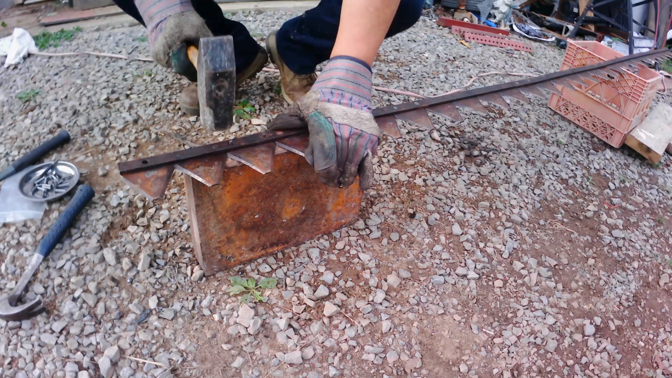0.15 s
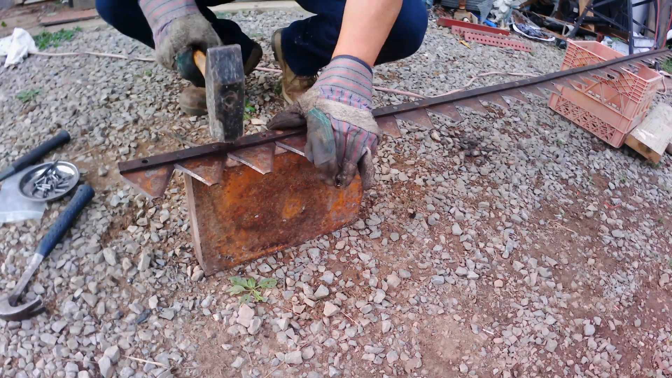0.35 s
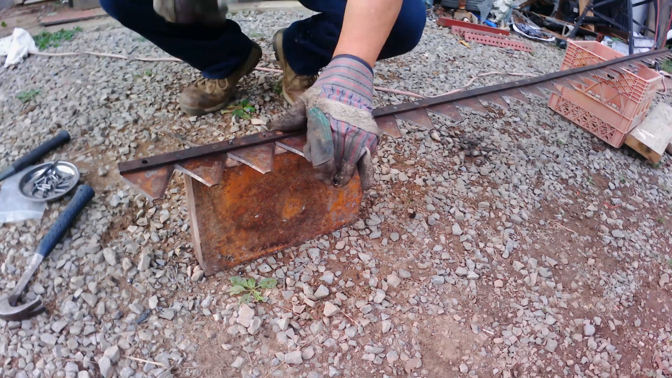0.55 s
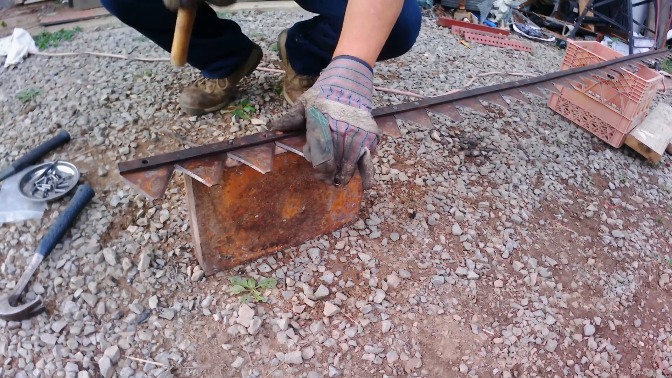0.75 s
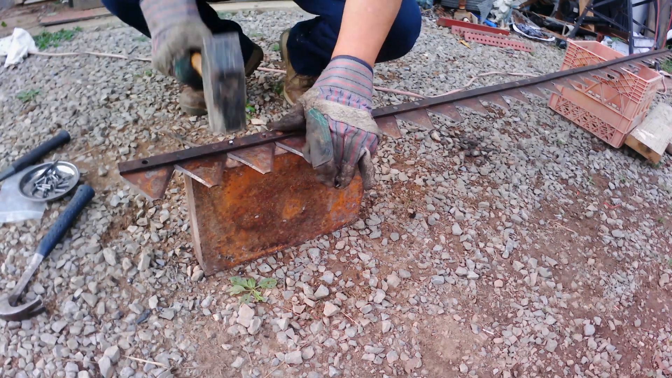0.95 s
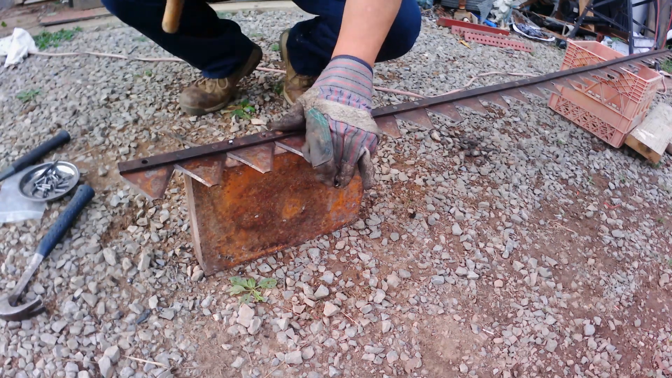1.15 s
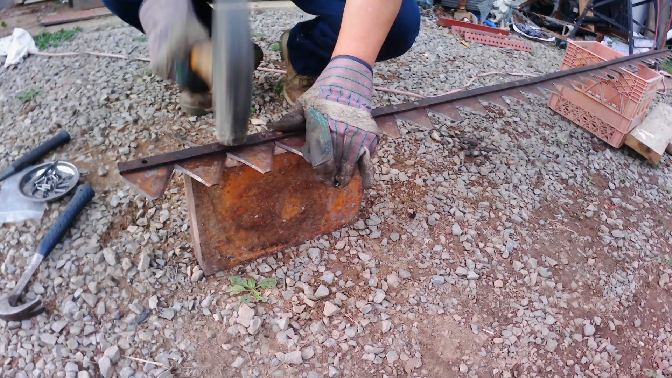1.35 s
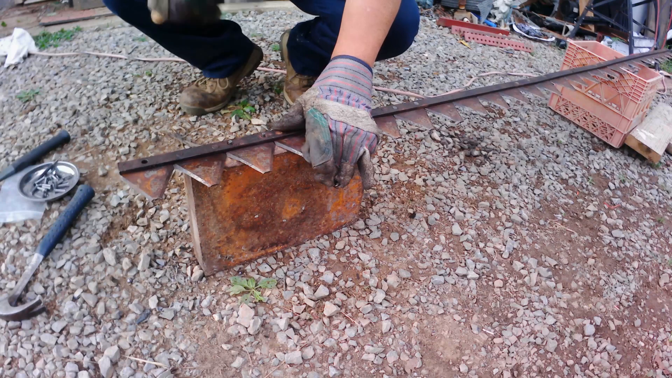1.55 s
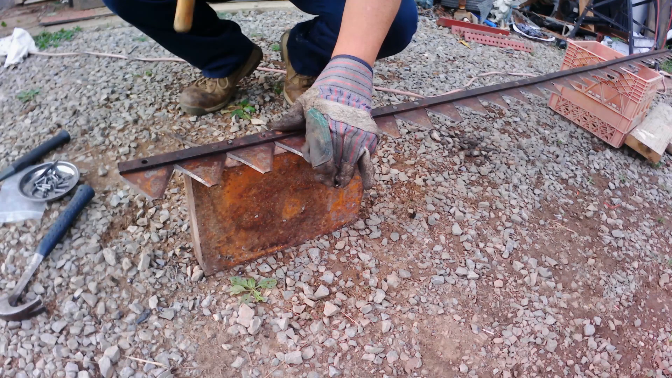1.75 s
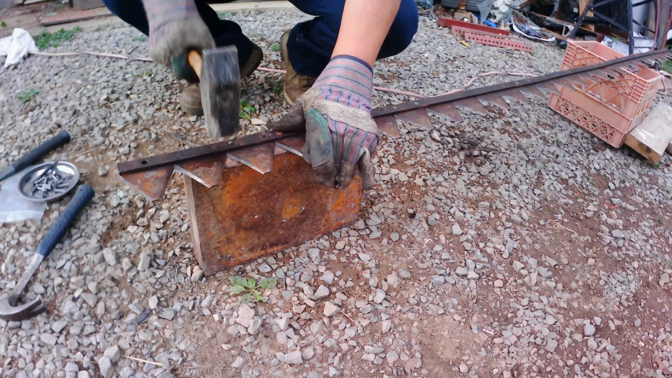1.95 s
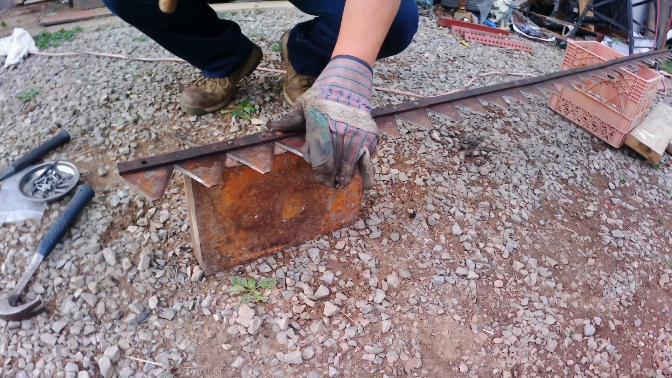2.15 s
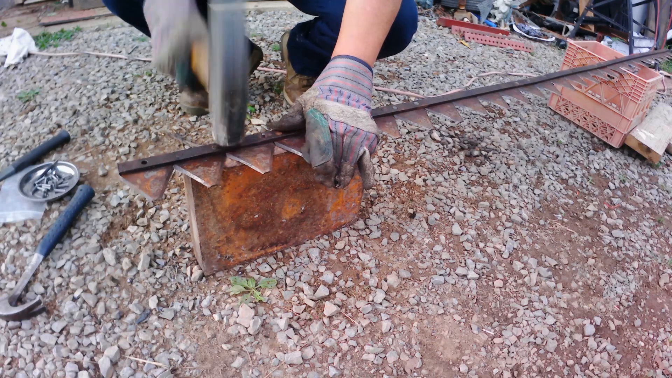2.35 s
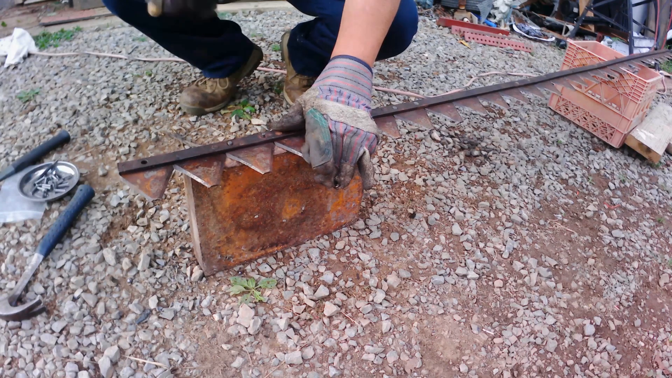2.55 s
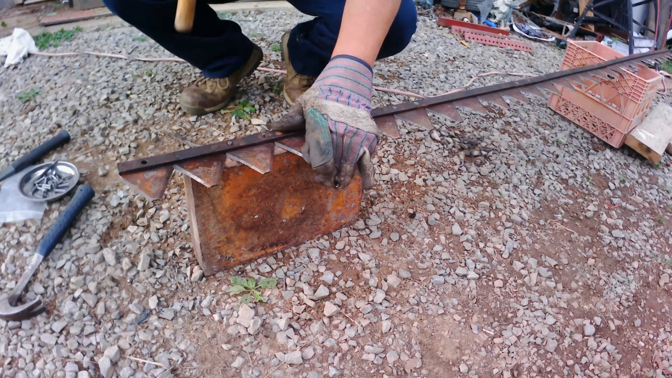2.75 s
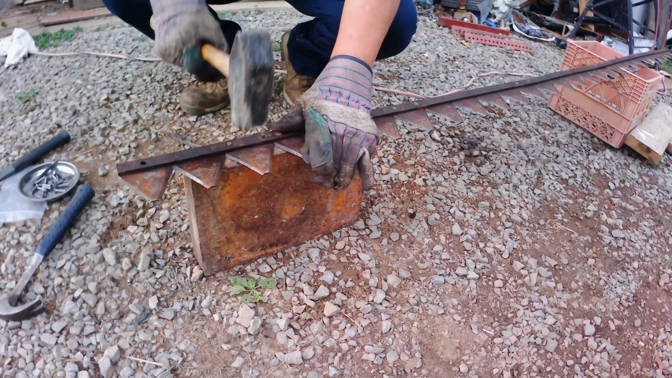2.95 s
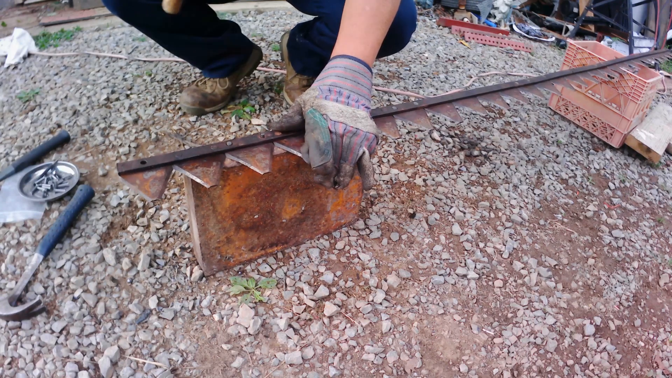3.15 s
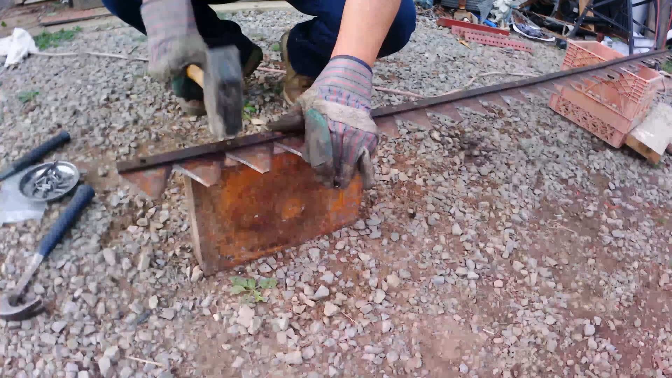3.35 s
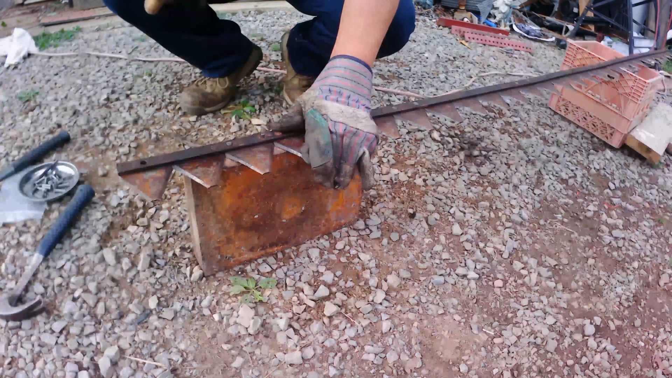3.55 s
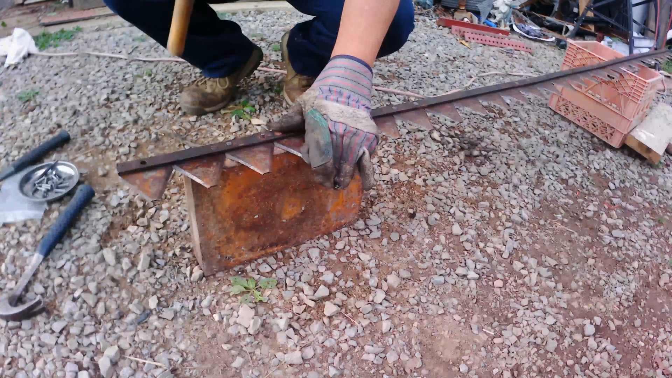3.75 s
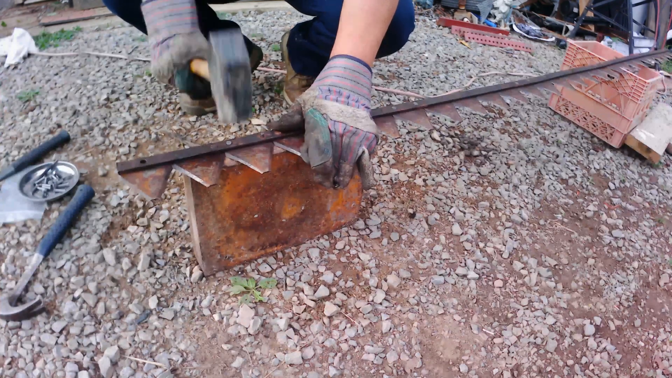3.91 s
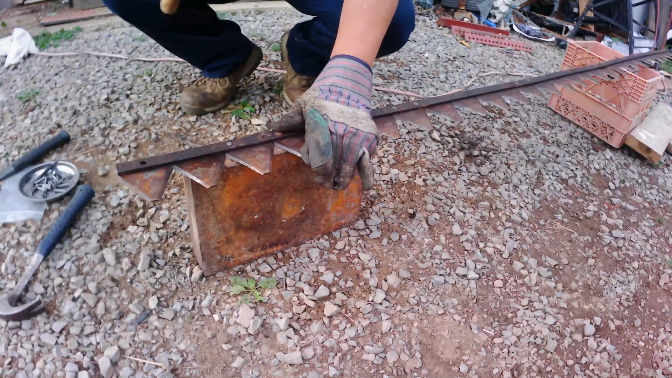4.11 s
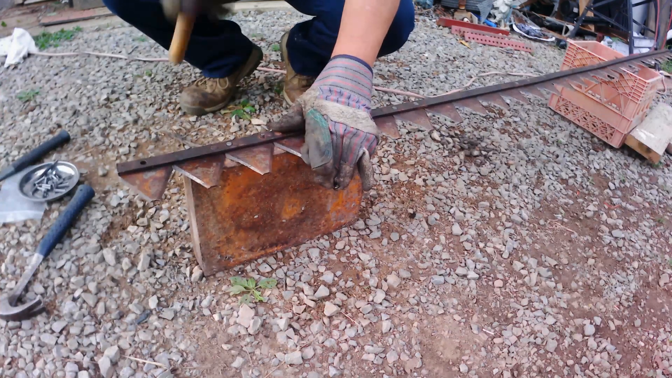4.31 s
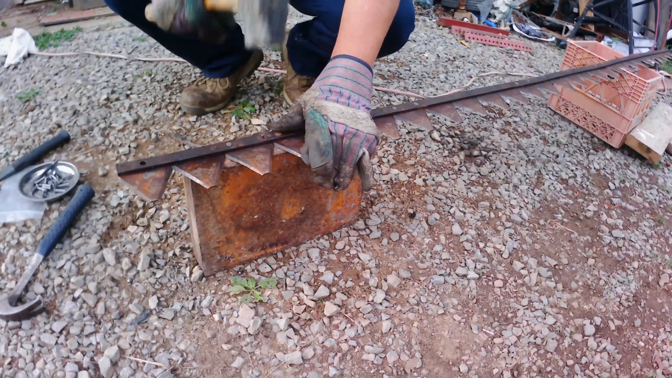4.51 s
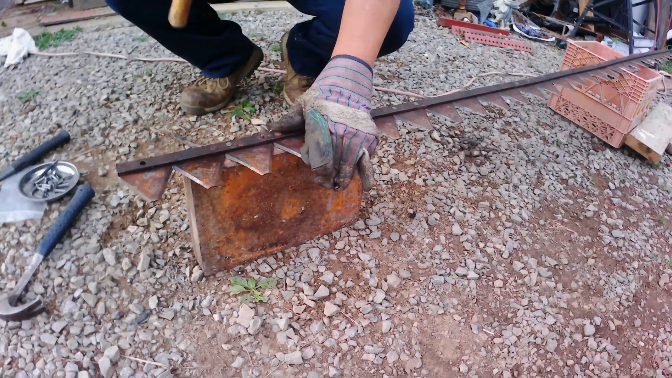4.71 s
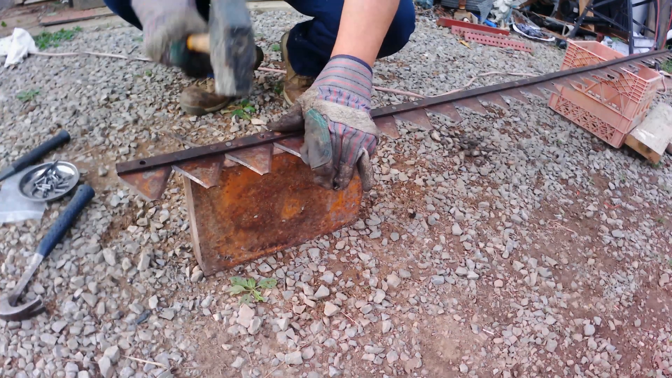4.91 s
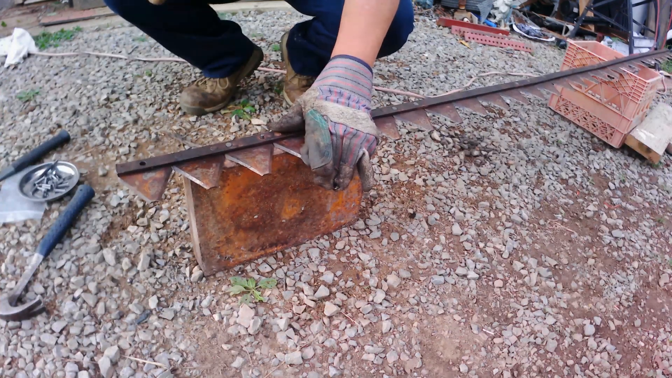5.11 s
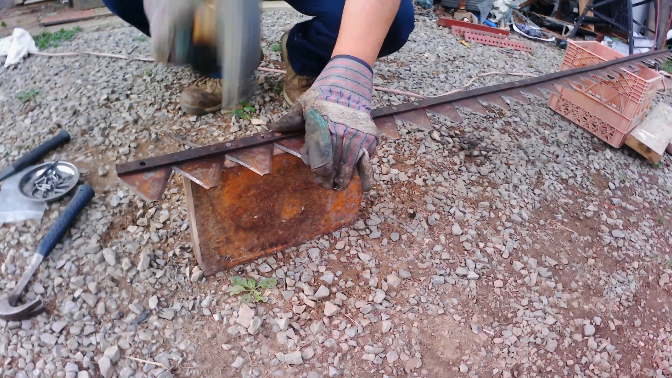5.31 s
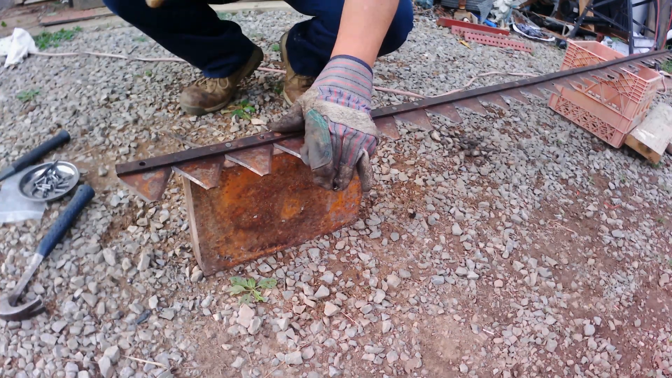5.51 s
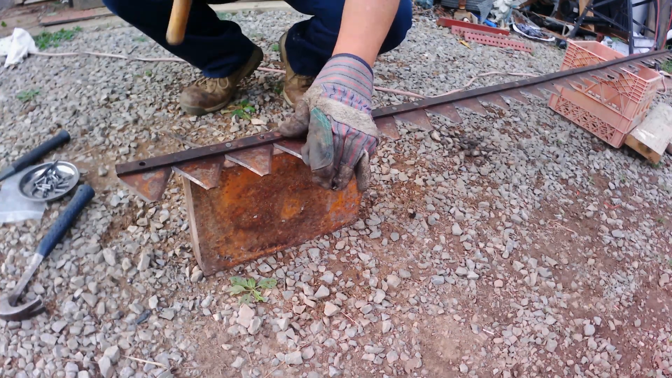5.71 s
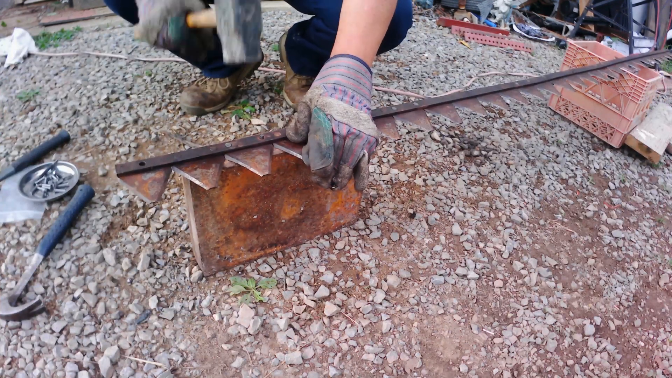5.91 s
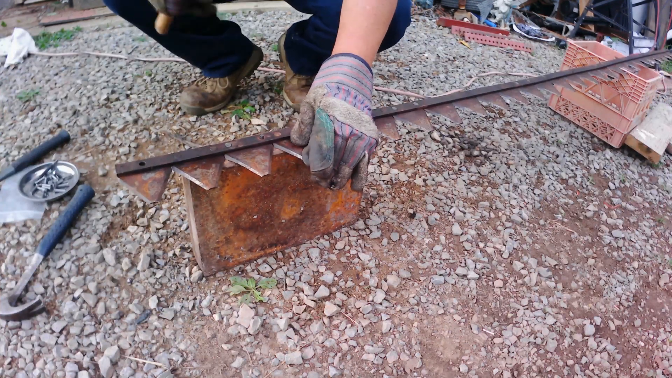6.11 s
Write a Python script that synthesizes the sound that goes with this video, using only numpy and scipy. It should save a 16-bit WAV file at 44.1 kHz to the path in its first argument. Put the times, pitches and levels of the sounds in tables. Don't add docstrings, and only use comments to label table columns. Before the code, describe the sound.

A gravel yard with quiet, steady hum and a faint, slightly wavering mid-pitched whine from a distant fan. In the first 0.15 seconds there are small dull ticks and scuffs of a tool and boots; another quick cluster of light metal taps comes at about 0.7. At 0.9 the first heavy hammer blow lands on a steel bar over a block, followed by blows about every half second: 1.4, 1.9, 2.4, 2.9, 3.4, 3.9, 4.3, 4.8, 5.3 and 5.8. The early ones are more restrained; from about 3 seconds they become harder, brighter and longer, strongest near the end. Each is an abrupt, clipped metallic crack with a knocking rivet, rattling loose blades, a quick bounce, a low thud into gravel, high ringing from the hammer head and a short wash from sheds. The last ring fades into hum and whine until 6.3.

```python
import sys
import numpy as np
from scipy import signal
from scipy.io import wavfile
from scipy.ndimage import uniform_filter1d

SR = 44100
rng = np.random.default_rng(int(sys.argv[2]) if len(sys.argv) > 2 else 0)


def put_to_file(sound):
    columns = np.atleast_2d(sound).T
    safe = np.clip(columns, -1, 1)
    whole_steps = np.round(safe * 32767)
    wavfile.write(sys.argv[1], SR, whole_steps.astype(np.int16))


def volts_from_decibels(level):
    exponent = np.asarray(level, float) / 20
    return 10 ** exponent


N = 276507

# (frequency [Hz], density [dB per Hz])
HUM_SPECTRUM = [(15, -70.5), (25, -40), (102, -6.5), (363, -12.5), (545, -15.5), (624, -4.5), (695, -17.5),
                (1130, -11.5), (3340, -32), (11300, -36.5), (12500, -40.5), (13600, -79), (16000, -83)]
# (time [s], frequency [Hz], level [dB])
FAN_TONE = [(0, 627, -48.5), (.3, 628.6, -40), (.65, 631.2, -44), (.7, 631.8, -56), (.77, 630.9, -40.5),
            (2.2, 636.6, -36), (2.62, 632.6, -40), (3.0, 641, -39.5), (3.4, 634, -38.5), (3.6, 633, -37),
            (4.3, 637.5, -39), (4.45, 646, -47), (4.56, 637.5, -40), (5.15, 640, -39), (5.451, 636.4, -40),
            (5.65, 638.2, -38.5), (6.0, 635.8, -37.5), (6.27, 635.5, -38)]
# (frequency [Hz], width [Hz], level [dB])
FAN_HISS = [(4237, 60, -78), (7150, 200, -70), (10815, 80, -71)]
# (time [s], peak level [dB], pitch [Hz], t60 [s])
TOUCHES = [(0.012, -26.5, 1050, 0.017), (.021, -42, 500, .02), (.039, -31, 560, .02),
           (.064, -29, 720, 0.013), (.083, -29, 1150, 0.012), (.119, -30, 487, 0.02),
           (0.664, -34, 890, 0.021), (0.686, -29, 1120, 0.017), (0.696, -24, 1050, 0.015),
           (0.7099, -20.5, 1160, 0.013), (.721, -36, 920, 0.012), (0.7316, -23, 1100, 0.016),
           (0.739, -35, 1200, .015), (.75, -34, 704, 0.032)]
# (frequency [Hz], t60 [s])
SHED_SPECTRUM = [(100, -15), (500, 10.5), (1500, 5), (2200, 7), (2900, 6.5), (3300, -2.5), (4200, 4),
                 (6000, -7), (8000, 1), (15000, 0)]
SHED_T60 = [(200, 0.35), (2000, 1.99), (5000, 1.61), (10000, 0.22)]
# (frequency [Hz], level [dB], t60 [s])
FREE_END_MODES = [(112.6, -30, 1.25), (205.5, -37.5, 1.4)]
# (frequency [Hz], level [dB], t60 [s])
THUD_MODES = [(71, -45, 0.033), (157.6, -4.5, 0.043), (160.3, -13, 0.059), (239.8, -17, 0.069),
              (390.4, -20.5, 0.08)]
# (frequency [Hz], width [Hz], level [dB], t60 [s])
BLOCK_RINGS = [(1051, 25, -32, 0.44), (2020, 25, -74, 0.37), (2264, 7.4, -47, 1.64), (2664, 38, -56, 2.2),
               (2836, 34, -50, 1.25), (3900, 90, -54, 1.3), (5680, 100, -53.5, 1.14)]
# (level [dB], t60 [s])
HEAD_HZ = [5590, 5950, 7550, 7854, 11700, 12000]
HEAD_DECAYS = [(-24, 0.17), (-41, 0.075), (-14, 0.2), (-16.5, 0.28), (-53, 0.095), (-42, 0.15)]
# (frequency [Hz], level [dB], t60 [s])
RIVET_MODES = [(1050, 8, 0.027), (1242, 2, 0.018)]
# (frequency [Hz], t60 [s])
CRACK_SPECTRUM = [(100, -39), (400, -8), (1000, -14), (2500, -8), (6000, -5), (15000, -31)]
CRACK_T60 = [(500, 0.099), (3000, 0.028), (10000, 0.017)]
# (frequency [Hz], t60 [s])
CLATTER_SPECTRUM = [(60, -19), (110, -1.5), (500, -3), (800, 0), (1050, -0.5), (1600, -1), (2200, -3.5),
                    (2800, -3), (3100, -13), (3900, -4), (4500, -9.5), (6000, -19.5), (8000, -17),
                    (16000, -49)]
CLATTER_T60 = [(100, 0.21), (600, 0.073), (1500, 0.11), (3000, 0.087), (6000, 0.086), (14000, 0.017)]
# (frequency [Hz], level [dB], t60 [s])
BAR_MODES = [(223, -10, 0.093), (486, -27, 0.37), (1048, 3, 0.08), (1200, -3, 0.075), (1490, 11, 0.029),
             (1640, -4.5, 0.1), (1806, 3, 0.1), (2235, -1.5, 0.15), (2494, -3, 0.12), (2645, -0.5, 0.086),
             (2712, 5, 0.095), (3800, -20, 0.033), (3773, -3, 0.11), (4750, -20.5, 0.14), (6030, -15, 0.13),
             (7000, -20, 0.039), (7600, -16.5, 0.16), (7550, -44.5, 0.26)]
# (time [s], strength [dB], rebound [dB], hammer side ring [dB], hammer face ring [dB])
BLOWS = [(0.8929, -14.5, -3, 3, -24), (1.3941, -10.5, -7, 7, -17), (1.8994, -12, -2.5, -3, -9.5),
         (2.3924, -8.5, -2.5, 10, -8.5), (2.888, -5, -8.5, 2, -9), (3.3776, -4, -6, -12, -7),
         (3.8646, -0.5, -11, -3, 4.5), (4.3446, -1.5, -12.5, -11, -0.5), (4.8229, 0, -14, 4, -2),
         (5.3079, 0.5, -8.5, -5, 4), (5.7875, -1, -12.5, 11, -2)]
# (frequency [Hz], level [dB])
MICROPHONE = [(20, -22), (52, -0.5), (85, 1.1), (9000, -5.45), (12200, -3), (12900, -7.5), (15600, -15.5),
              (16300, -40)]

BRIGHTNESS = 1.98, 0.31
RING_LENGTH = 0.97, 0.012
THUD_DB, SWAY_DB, BLOCK_DB = (11, 0.35), (1, 0.18), (4, 1.2)
TOP_RING_DB, ECHO_DB = (6.5, 1.4), (17, 1.33)


def evened(x):
    return x / np.sqrt(np.mean(x ** 2) + 1e-20)


def read(points, hz):
    f, value = np.transpose(points)
    return np.interp(np.log(hz + 1), np.log(f + 1), value)


def add(mix, s, sound):
    part = mix[round(s * SR):][:len(sound)]
    part += sound[:len(part)]


def follow(rule, strength_db):
    return rule[0] + rule[1] * strength_db


def resonate(x, hz, width):
    turn = np.exp(2j * np.pi * np.cumsum(hz * np.ones(len(x))) / SR)
    r = np.exp(-np.pi * width / SR)
    return 2 * (turn * signal.lfilter([1 - r], [1, -r], x / turn)).real


def ring(modes, t, tilt_db, length, scatter_db, split, turns):
    hz, db, t60 = np.repeat(np.transpose(modes), 3, axis=1)[:, :, None]
    a, b, c = rng.standard_normal((len(hz), 1, 3)).transpose(2, 0, 1)
    level_db = db - 7.5 + tilt_db * np.log2(hz / 1000) + scatter_db * a
    start = volts_from_decibels(level_db) * np.exp(2j * np.pi * turns * c)
    pole = 2j * np.pi * hz * (1 + split * b) - np.log(1000) / (t60 * length)
    return ((start * np.exp(pole * t[::180])).T @ np.exp(pole * t[:180])).imag.ravel()


def wash(colour, t60s, count, tilt_db, length, size):
    hz = np.fft.rfftfreq(size, 1 / SR)[:, None]
    t = np.arange(count * 4 // size + 5) * (size // 4) / SR
    a, b = rng.standard_normal((len(t), len(hz), 2)).T
    start = volts_from_decibels(read(colour, hz) + tilt_db * np.log2(hz / 1000 + 0.054))
    decay = volts_from_decibels(-60 * t / (length * read(t60s, hz)))
    z = (a + 1j * b) * start / np.linalg.norm(start) * decay
    return signal.istft(z, nperseg=size, noverlap=size * 3 // 4)[1][:count]


def hum():
    hz = np.fft.rfftfreq(1024, 1 / SR)
    a, b, patches = rng.standard_normal((N // 256 + 5, 513, 3)).T
    patches = evened(uniform_filter1d(uniform_filter1d(patches, 10, 0), 12, 1))
    z = (a + 1j * b) * volts_from_decibels(read(HUM_SPECTRUM, hz)[:, None] + 0.46 * patches)
    level_db = -42.5 + 1.5 * np.exp(-np.arange(N) / SR / 0.091)
    return volts_from_decibels(level_db) * evened(signal.istft(z, nperseg=1024, noverlap=768)[1][:N])


def whine():
    t = np.arange(N) / SR
    s, hz, db = np.transpose(FAN_TONE)
    waver = evened(uniform_filter1d(uniform_filter1d(rng.standard_normal((2, N)), 900), 900))
    turns = np.cumsum(np.interp(t, s, hz) + 1.7 * waver[0]) / SR
    swell_db = 0.55 * evened(uniform_filter1d(waver[1], size=4000))
    tone_db = np.interp(t, s, db) + 0.34 * waver[1] + swell_db
    tone = volts_from_decibels(tone_db) * np.sin(2 * np.pi * turns)
    near_db, far_db, fades_s = -50.5, -60.5, 0.58
    octave_db = far_db + (near_db - far_db) * np.clip((fades_s - t) / 0.12, 0, 1)
    octave_db += 3.7 * evened(uniform_filter1d(waver[0], size=9000))
    tone += volts_from_decibels(octave_db) * np.sin(4 * np.pi * turns)
    air = rng.standard_normal(N)
    hiss = sum(volts_from_decibels(d) * evened(resonate(air, f, w)) for f, w, d in FAN_HISS)
    return np.sqrt(2) * tone + hiss


def touch(peak_db, hz, t60):
    t = np.arange(3000) / SR
    knock = np.sin(2 * np.pi * hz * t)
    knock += 0.4 * np.sin(2 * np.pi * 420 * t) + 0.08 * np.sin(2 * np.pi * 2300 * t)
    grit = rng.standard_normal(len(t))
    scuff = evened(resonate(resonate(grit, 390, 350), 390, 350))
    scuff += 0.49 * evened(resonate(resonate(grit, 1340, 700), 1340, 700))
    tick = knock * volts_from_decibels(-60 * t / t60) + 0.19 * scuff * volts_from_decibels(-60 * t / 0.079)
    tick *= np.sin(np.pi / 2 * np.clip(t / 0.0013, 0, 1)) ** 2
    return volts_from_decibels(peak_db) * tick / abs(tick).max()


def shed_echoes(t, strength_db):
    echoes = 0.73 * np.clip((t - 0.03) / 0.026, 0, 1)
    echoes += 0.43 * np.clip((t - 0.11) / 0.02, 0, 1)
    echoes += 0.48 * np.exp(-((t - 0.25) / 0.089) ** 2)
    level = volts_from_decibels(follow(ECHO_DB, strength_db) - 49.5)
    return level * wash(SHED_SPECTRUM, SHED_T60, len(t), 0, 0.98, size=256) * echoes


def free_end(t, strength_db):
    db = follow(SWAY_DB, strength_db)
    late = np.clip((t - 0.045) / 0.06, 0, 1) * np.clip((0.31 - t) / 0.08, 0.2, 1)
    beat = 1 + 0.3 * np.cos(2 * np.pi * 10.5 * (t - 0.11))
    low = ring(FREE_END_MODES[:1], t, 0, 0.54, scatter_db=0.6, split=0.022, turns=0.03)
    high = ring(FREE_END_MODES[1:], t, 0, 0.72, scatter_db=1.7, split=0.012, turns=0.023)
    return volts_from_decibels(db + 7) * low * late * beat + volts_from_decibels(db + 3) * high * np.clip(t / 0.087, 0, 1)


def ground_thud(t, strength_db):
    ground = ring(THUD_MODES, t, 0, 1, scatter_db=0.4, split=0.004, turns=0.01)
    return volts_from_decibels(follow(THUD_DB, strength_db) + 3.5) * ground * (1 - np.exp(-t / 0.0066))


def block_rings(t, strength_db):
    grit = rng.standard_normal(len(t))
    whistles = sum(volts_from_decibels(db + 2.8 * chance - 60 * t / t60) * evened(resonate(grit, hz, width))
                   for (hz, width, db, t60), chance in zip(BLOCK_RINGS, grit))
    return volts_from_decibels(follow(BLOCK_DB, strength_db)) * whistles


def hammer_head(t, side_db, face_db, top_db):
    head = np.column_stack([HEAD_HZ, HEAD_DECAYS])
    head[:, 1] += np.repeat([side_db, face_db, top_db], 2)
    return ring(head, t, 0, 0.75, scatter_db=3.0, split=0.004, turns=0.36)


def blade_shimmer(t, top_db):
    low_hz, high_hz, db, t60 = 8237, 12409, -31.5, 0.2049
    blades = [(hz, db + top_db, t60) for hz in low_hz + (high_hz - low_hz) * rng.random(10)]
    return ring(blades, t, 0, 0.65, scatter_db=5.5, split=0.018, turns=0.26)


def squeezed_rivet(t, strength_db):
    knock = ring(RIVET_MODES, t, 0, 0.64, scatter_db=1.1, split=0.018, turns=0)
    return volts_from_decibels(0.5 * strength_db + 13.5) * knock


def clatter(t, rebound_db, tilt_db, length):
    def burst(tilt, stretch):
        return wash(CLATTER_SPECTRUM, CLATTER_T60, len(t), tilt, stretch, size=128)

    chatter_db = 2.03 * evened(uniform_filter1d(rng.standard_normal(len(t)), 250))
    sound = volts_from_decibels(5.0 + chatter_db) * burst(tilt_db, length)
    landing = burst(tilt_db, length) * np.clip(t / 0.017, 0, 1)
    add(sound, 0.026, volts_from_decibels(rebound_db) * landing)
    add(sound, 0.07, volts_from_decibels(rebound_db - 18.5) * landing[:len(t) // 2])
    return sound + volts_from_decibels(chatter_db - 16.0) * burst(tilt_db - 1.0, 2.32)


def struck_steel(t, strength_db, rebound_db):
    tilt_db = follow(BRIGHTNESS, strength_db)
    length = follow(RING_LENGTH, strength_db)
    steel = clatter(t, rebound_db, tilt_db, length)
    steel += volts_from_decibels(-6) * ring(BAR_MODES, t, tilt_db, length, scatter_db=2.0, split=0.00876, turns=0.44)
    steel += volts_from_decibels(10.5) * wash(CRACK_SPECTRUM, CRACK_T60, len(t), tilt_db, 1, size=32)
    overdrive_db = 10
    return steel * volts_from_decibels(strength_db + overdrive_db) * (1 - np.exp(-t / 0.00046))


def blow(strength_db, rebound_db, side_db, face_db):
    t = np.arange(int(SR * 0.6)) / SR
    top_db = follow(TOP_RING_DB, strength_db)
    sound = shed_echoes(t, strength_db) + free_end(t, strength_db)
    sound += ground_thud(t, strength_db) + block_rings(t, strength_db)
    sound += hammer_head(t, side_db, face_db, top_db) + blade_shimmer(t, top_db)
    sound -= squeezed_rivet(t, strength_db)
    sound += struck_steel(t, strength_db, rebound_db)
    return sound * np.clip((t[-1] - t) * 10, 0, 1)


def scene():
    mix = hum() + whine()
    for s, *row in TOUCHES:
        add(mix, s, touch(*row))
    for s, *row in BLOWS:
        add(mix, s, blow(*row))
    return mix[None]


def drained(x):
    hz, t, z = signal.stft(x, SR, nperseg=512)
    keep, brief = np.exp(-256 / SR / 0.13), np.exp(-256 / SR / 0.013)
    power = (abs(z) ** 2).sum(1)
    edge_hz = 12750 - 2400 * np.tanh(signal.lfilter([1 - keep], [1, -keep], power) / 0.015)
    open_share = np.clip((edge_hz[:, None] - hz[:, None]) / 250 + 0.5, 0, 1)
    bands = uniform_filter1d(uniform_filter1d(abs(z), size=5, axis=1), size=5, axis=2)
    mask = volts_from_decibels(-60) * np.sqrt(signal.lfilter([1 - brief], [1, -brief], power))[:, None]
    kept = np.clip(2.4 * (bands / (mask + 1e-9) - 1), 0, 1) + (hz[:, None] < 7950)
    gain = np.where(bands < volts_from_decibels(-84), open_share, 1) * np.minimum(kept, 1)
    return signal.istft(z * gain, SR, nperseg=512)[1][:, :N]


def top_cut(x):
    return signal.sosfilt(signal.butter(12, 16510, fs=SR, output="sos"), x)


def record(dry):
    ceiling, knee = 0.91, 6
    squared = dry / (1 + abs(dry / ceiling) ** knee) ** (1 / knee)
    hz = np.linspace(0, SR / 2, 2049)
    response = volts_from_decibels(read(MICROPHONE, hz) - read(MICROPHONE, 1080))
    colour = signal.firwin2(2047, hz, response, fs=SR)
    rounded = signal.oaconvolve(squared, colour[None], "same")
    finished = np.clip(drained(rounded), -1, 1)
    return top_cut(finished)


dry = scene()
out = record(dry)
put_to_file(out)
```